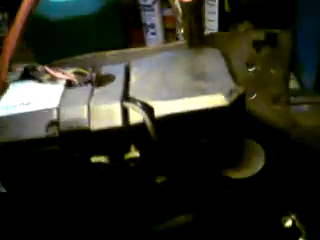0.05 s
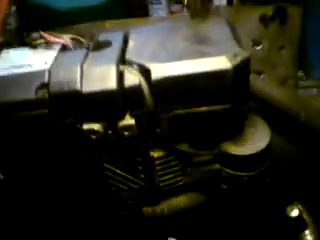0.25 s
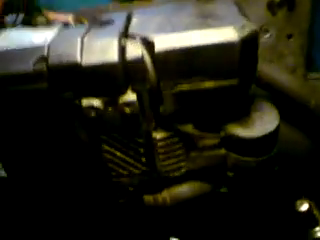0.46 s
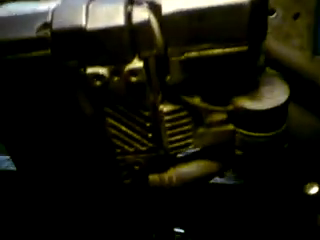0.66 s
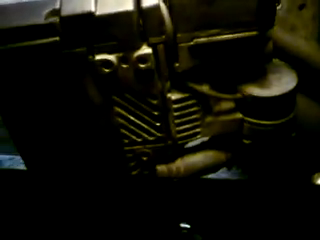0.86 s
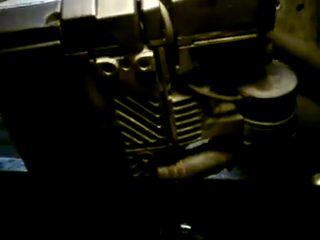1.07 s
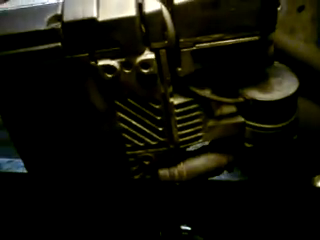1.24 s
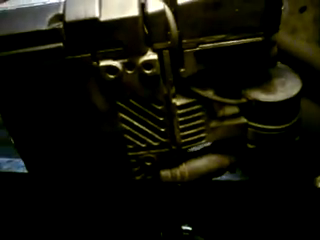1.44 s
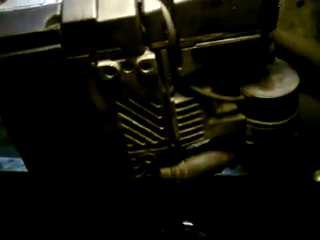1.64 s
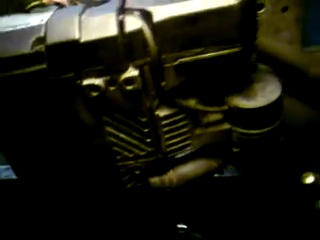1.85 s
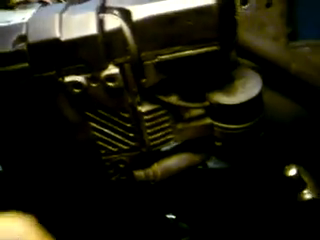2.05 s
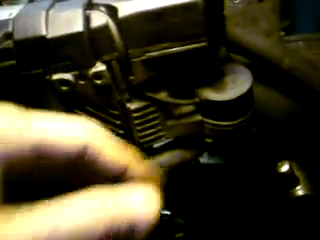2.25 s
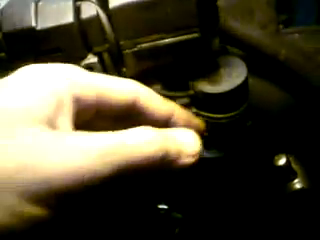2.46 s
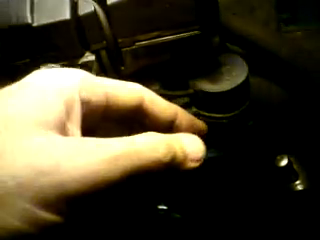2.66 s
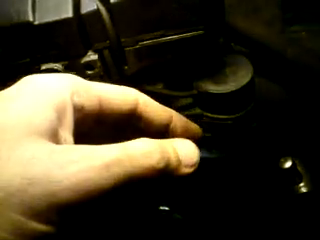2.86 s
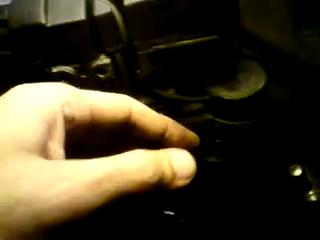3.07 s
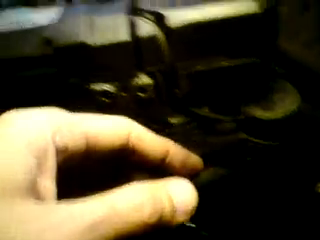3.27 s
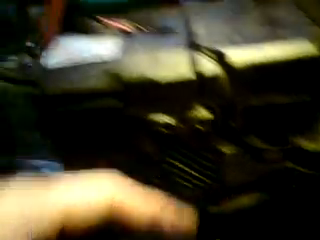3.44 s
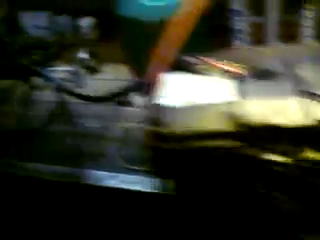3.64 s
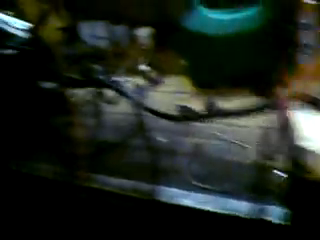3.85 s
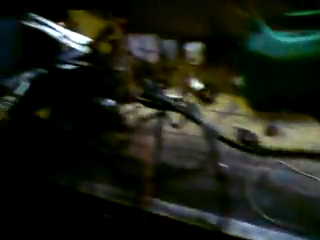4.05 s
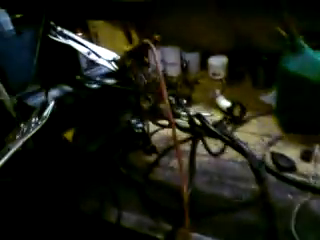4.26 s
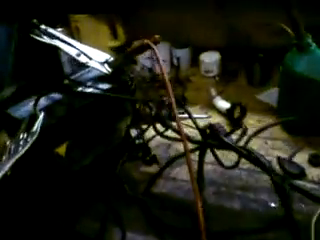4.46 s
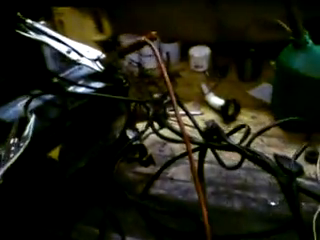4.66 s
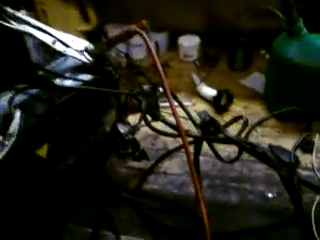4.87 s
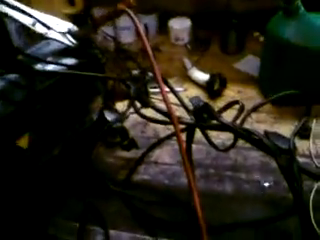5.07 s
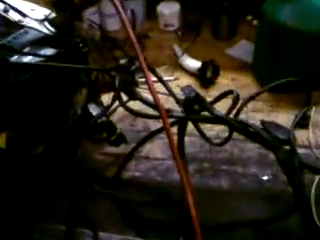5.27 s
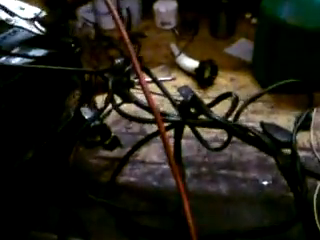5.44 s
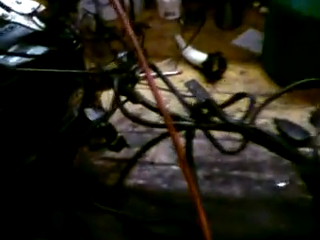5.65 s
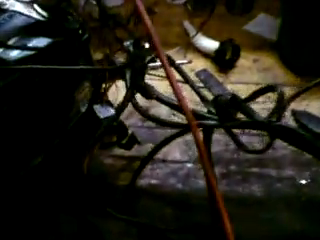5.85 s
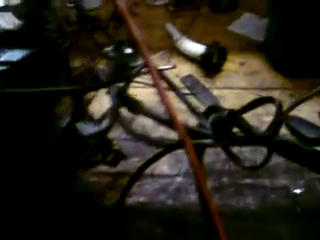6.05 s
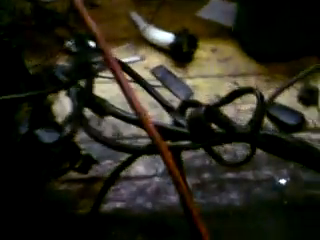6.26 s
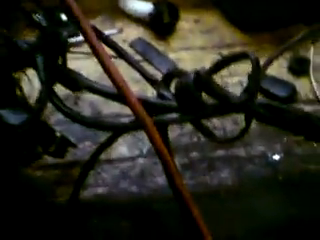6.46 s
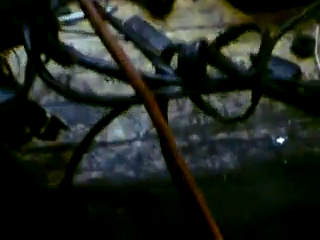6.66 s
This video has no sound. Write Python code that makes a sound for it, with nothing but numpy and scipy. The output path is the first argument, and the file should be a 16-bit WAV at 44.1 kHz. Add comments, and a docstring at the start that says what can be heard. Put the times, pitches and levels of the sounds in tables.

```python
"""A blower whine over a rush of air and flame, with a fixed-pitch singing tone, from a small fuel-fired heater
on a workbench. The whine and its companions are sines on whole multiples of the shaft speed, which sags at each
stroke of the fuel pump; the chopped motor drive and a thin whistle are sines of fixed pitch. The rush is shaped
noise. A hand-held microphone stays close to the casing, then swings away along the bench."""
import sys
import numpy as np
from scipy import signal
from scipy.io import wavfile
from scipy.ndimage import uniform_filter1d

SR = 44100
rng = np.random.default_rng(int(sys.argv[2]) if len(sys.argv) > 2 else 0)


def pcm_store(signal):
    """Save signal as 16-bit PCM."""
    levels = np.round(np.clip(np.atleast_2d(signal), -1, 1) * 32767)
    wavfile.write(sys.argv[1], SR, levels.astype(np.int16).T)


def ratio(d):
    """dB to gain"""
    e = np.asarray(d, float) / 20
    return 10 ** e


N = 295911  # length [samples]

# blower shaft before stroke sags and wobble: (time [s], speed [turns/s])
SHAFT_SPEED = [(0, 119.31), (.5, 119.45), (.95, 119.43), (1.3, 118.65), (1.8, 118.25), (2.2, 118.05),
               (2.8, 117.63), (3.5, 117.28), (3.9, 116.72), (4.4, 115.82), (5, 115.73), (5.55, 116.0),
               (6, 115.52), (6.71, 114.83)]
# fuel pump strokes, each loading the supply: (time [s])
PUMP_STROKES = [.49, 1.125, 1.752, 2.394, 3.03, 3.665, 4.333, 5.003, 5.668, 6.344]
# main whine at the moving microphone: (time [s], level [dB])
WHINE_LEVEL = [(0, -36.5), (.76, -36), (.86, -40), (1.1, -40), (1.2, -49), (1.55, -43.5), (1.87, -50.5),
               (2.15, -43), (2.4, -38.5), (2.67, -43), (3.25, -41), (3.75, -32), (4.02, -34.5), (4.25, -40),
               (4.36, -56), (4.49, -45), (5.25, -40), (5.37, -45), (5.77, -48.5), (5.87, -53), (6.38, -45),
               (6.62, -44), (6.71, -50)]
# its three strongest companions, before waver:
# (time [s], order 14 level [dB], order 24 level [dB], order 38 level [dB])
COMPANION_LEVELS = [(0, -44, -70, -44.5), (.35, -44, -53, -45.5), (1.0, -42, -59, -52),
                    (1.4, -44.5, -55, -47.5), (2.1, -45.5, -57, -51.5), (2.5, -45, -57.5, -44),
                    (3.5, -43.5, -56.5, -47), (3.95, -47, -59, -48), (4.2, -52.5, -54.5, -59.5),
                    (4.5, -59.5, -53, -58), (5.05, -56, -52.5, -52), (5.3, -63, -50.5, -59.5),
                    (5.5, -69, -53, -55), (5.75, -65, -57, -60), (5.88, -69, -67, -52),
                    (6.12, -71, -67, -67), (6.4, -69, -58, -53.5), (6.71, -71, -58, -55.5)]
# shaft orders of those companions: (order [cycles per turn])
COMPANION_ORDERS = [14, 24, 38]
# weaker shaft orders, before waver:
# (order [cycles per turn], level near the casing [dB], level along the bench [dB])
WEAK_ORDERS = [(9, -60, -76), (11, -53, -65), (13, -55, -65), (15, -52, -71), (16, -62, -64),
               (17, -53, -66), (18, -62, -68), (20, -70, -68), (21, -61, -62), (22, -65, -64),
               (23, -61, -62), (25, -63, -63), (26, -71, -63), (31, -59, -74), (32, -65, -72),
               (36, -52, -65), (37, -63, -69), (40, -66, -72), (41, -72, -72), (42, -80, -74),
               (43, -79, -76), (53, -83, -85), (54, -82, -82), (55, -80, -84), (56, -79, -80),
               (57, -78, -90)]
# drive tone and its third harmonic: (frequency [Hz])
DRIVE_TONES_HZ = [1965.3, 5895.9]
# drive tone at the microphone: (time [s], level [dB])
DRIVE_LEVEL = [(0, -33), (.45, -35.5), (.7, -38.5), (.9, -38), (1.9, -37.5), (2.42, -40), (2.62, -45.5),
               (3.02, -49), (3.3, -38), (3.7, -37.5), (4.1, -42.5), (4.27, -58), (4.5, -56), (4.63, -50.5),
               (4.95, -48), (5.36, -51), (5.5, -46), (5.88, -49), (6.02, -64), (6.13, -56), (6.35, -53.5),
               (6.71, -37)]
# third harmonic of the drive tone: (time [s], level [dB])
DRIVE_THIRD_LEVEL = [(0, -68.5), (.42, -60.5), (.65, -71), (1.45, -60.5), (1.62, -71.5), (2.0, -64),
                     (2.7, -73), (3.4, -61), (3.68, -71.5), (3.88, -61.5), (4.28, -53), (4.75, -74.5),
                     (4.95, -61.5), (5.13, -69), (5.55, -62.5), (5.97, -72.5), (6.15, -60.5), (6.37, -67),
                     (6.63, -55), (6.71, -57)]
# thin whistle, strongest in front of the casing: (time [s], level [dB])
WHISTLE_LEVEL = [(0, -76), (.5, -60.5), (1.1, -53.5), (2.5, -53), (3.2, -57), (3.5, -67), (4.0, -61),
                 (4.4, -71), (6.71, -79)]
# rush at the microphone, relative levels: (time [s], whole rush [dB], extra treble facing the air intake [dB])
MIC_RUSH = [(0, -46, -3.5), (.3, -46, -1), (.55, -45, 0), (1.0, -45.5, .5), (2.0, -46.5, .5), (2.8, -45, 0),
            (3.4, -46, 0.5), (3.75, -46.5, .5), (3.95, -49, 0), (4.3, -53.5, -2), (4.9, -55, -2.5),
            (5.2, -54.5, -2), (5.55, -55.5, -1), (5.8, -54, -4), (6.1, -55.5, -4.5), (6.71, -54, -4)]
# nearness of the microphone to the casing: (time [s], share [0-1])
NEARNESS = [(0, 0.95), (3.7, 1), (4.1, 0.3), (4.4, 0.37), (6.71, 0.14)]
# colour of the rush: (frequency [Hz], gain near the casing [dB], gain along the bench [dB])
RUSH_COLOUR = [(205, -10.5, -2), (314, 4, 5.5), (480, 5, 3.5), (640, 1.5, 2), (694, 1.5, -5), (860, 0.5, 0),
               (1000, -0.5, -0.5), (1070, -0.5, 1.5), (1210, 4, 6), (1600, 5, -4.5), (2090, 9, 7.5),
               (2390, -3, 6), (2650, -9, 4), (2900, -3, 3.5), (3290, 2.5, 2.5), (3544, -2.5, -4),
               (4145, 7.5, 3), (4890, -8, 1.5), (5100, -20.5, -13.5)]
# band limits of the rush at the microphone: (frequency [Hz], gain [dB])
RUSH_LIMITS = [(25, -28.5), (70, -16.5), (120, -0.5), (5600, -1), (5950, 3.5), (6350, -3), (6800, 1.5),
               (7500, 0), (7800, 2.5), (8300, -2.5), (8450, -16.5), (9100, -40), (9800, -71)]
# echo off the bench top, before the treble is scattered: (time [s], delay [ms], strength [0-1])
BENCH_ECHO = [(0, 0.7, 0.04), (3.9, 1.06, 0), (4.5, 1.56, 0.16), (5.1, 1.62, 0.4), (5.7, 1.58, 0.46),
              (6.2, 1.44, 0.4), (6.71, 1.48, 0.4)]
# flame rumble, relative: (frequency [Hz], level near the casing [dB], level along the bench [dB])
FLAME_RUMBLE = [(25, -82, -80.5), (71, -75, -76), (123, -54, -65), (170, -57, -59.5), (218, -60.5, -56),
                (272, -67, -66.5), (400, -89.5, -91), (810, -150, -150)]

SAG_TURNS_PER_S, SAG_S, RECOVER_S = 0.63, 0.075, 0.25  # sag scale before recovery, ramp, recovery constant
WHINE_ORDER, WHISTLE_HZ = 19, 2908
FLAME_LIFT_DB = 1.9  # peak lift of the rush at a stroke


def curves(rows, t):
    """Columns of a table joined by straight lines."""
    s, *columns = np.transpose(rows)
    return [np.interp(t, s, c) for c in columns]


def spectra(rows, hz):
    """Columns of a table read on a log-frequency axis."""
    return curves([(np.log(f), *db) for f, *db in rows], np.log(hz + 1))


def drift(t, top_hz):
    """Slow random movement of standard deviation 1: twelve sines, the slower ones stronger."""
    hz = np.geomspace(top_hz / 20, top_hz, 12)
    phase = rng.random((12, 1))
    x = np.sin(2 * np.pi * (hz[:, None] * t + phase)).T @ hz ** -0.5
    return x / x.std()


def slow_drift(t, top_hz):
    """The same movement computed on every 256th sample and joined by straight lines."""
    coarse = t[::256]
    return np.interp(t, coarse, drift(coarse, top_hz))


def tone(turns, db):
    """A sine of the given rms level, its phase counted in turns from a random start."""
    return np.sqrt(2) * ratio(db) * np.sin(2 * np.pi * (turns + rng.random()))


def shaft(t):
    """Shaft speed [turns/s]: a slow run-down, dented by every pump stroke."""
    since = t - np.array(PUMP_STROKES)[:, None]
    onset = np.clip(since / SAG_S + 0.5, 0, 1)  # ramp centred on the stroke
    recovery = np.exp(-np.maximum(since, 0) / RECOVER_S)
    sag = (onset * recovery).sum(0)
    return curves(SHAFT_SPEED, t)[0] - SAG_TURNS_PER_S * sag


def blower(t, turns):
    """Blades and windings ring on whole multiples of the shaft; all but the main whine waver at random."""
    near = curves(NEARNESS, t)[0]
    out = tone(WHINE_ORDER * turns, curves(WHINE_LEVEL, t)[0])
    for order, db in zip(COMPANION_ORDERS, curves(COMPANION_LEVELS, t)):
        waver_db = 1.5 * slow_drift(t, 5)
        out += tone(order * turns, db + waver_db)
    for order, near_db, far_db in WEAK_ORDERS:
        waver_db = 2.8 * slow_drift(t, 3)
        out += tone(round(order) * turns, near * near_db + (1 - near) * far_db + waver_db)
    return out


def drive(t):
    """The chopped supply makes the windings sing at a pitch that ignores the speed."""
    levels = curves(DRIVE_LEVEL, t) + curves(DRIVE_THIRD_LEVEL, t)  # a list of two
    return sum(tone(hz * t, db) for hz, db in zip(DRIVE_TONES_HZ, levels))


def whistle(t):
    """A thin sine of steady pitch whose level follows the microphone's place."""
    return tone(WHISTLE_HZ * t, curves(WHISTLE_LEVEL, t)[0])


def rush(turns):
    """Turbulent air and flame: random spectra coloured by casing, intake and bench echo."""
    frames = N // 256 + 5
    hz = np.fft.rfftfreq(1024, 1 / SR)[:, None]
    t = np.arange(frames) * 256 / SR
    near = curves(NEARNESS, t)[0]
    rush_db, intake_db = curves(MIC_RUSH, t)
    real, imaginary, patches = rng.standard_normal((frames, 513, 3)).T
    # random patches of level, smooth over frequency and time
    patches = uniform_filter1d(uniform_filter1d(patches, size=10, axis=0), size=30, axis=1)
    patches_db = 1.02 * patches / patches.std()

    near_db, far_db = spectra(RUSH_COLOUR, hz)
    colour_db = near * near_db + (1 - near) * far_db + spectra(RUSH_LIMITS, hz)[0]
    intake = 1 / (1 + (2900 / (hz + 1)) ** 8)  # the intake beams the treble
    air_db = colour_db + rush_db + intake * intake_db - 12.5

    delay_ms, strength = curves(BENCH_ECHO, t)
    scatter = 1 / (1 + (hz / 2500) ** 4)  # clutter on the bench breaks up the treble echo
    delayed = np.exp(-2j * np.pi * hz * delay_ms / 1000)
    echo = 1 + np.clip(strength, 0, 1) * scatter * delayed

    low_near_db, low_far_db = spectra(FLAME_RUMBLE, hz)
    rumble = ratio(near * low_near_db + (1 - near) * low_far_db)
    # the flame lifts just after each stroke
    flame_db = sum(FLAME_LIFT_DB * np.exp(-((t - s - 0.01) / 0.027) ** 2) for s in PUMP_STROKES)
    size = np.hypot(ratio(air_db) * abs(echo), rumble) * ratio(flame_db + patches_db)
    air = signal.istft((real + 1j * imaginary) * size, nperseg=1024, noverlap=768)[1][:N]
    treble = signal.sosfilt(signal.butter(2, 3000, "high", fs=SR, output="sos"), air)
    # the treble throbs with the rotor, once and twice a turn
    throb = 0.11 * np.cos(2 * np.pi * turns) + 0.21 * np.cos(4 * np.pi * turns)
    return air + treble * throb


def scene():
    """Blower, drive, whistle and rush at one microphone."""
    t = np.arange(N) / SR
    wobble = 1 + 0.00022 * slow_drift(t, 30)
    turns = np.cumsum(shaft(t) * wobble) / SR
    return (blower(t, turns) + drive(t) + whistle(t) + rush(turns))[None]


def drop_masked(x, below_all_db=-51, below_near_db=-22, jitter_db=4):
    """Thrifty compression: lines far weaker than the whole sound, or than their neighbours, are dropped."""
    z = signal.stft(x, nperseg=2048, noverlap=1536)[2]
    power = uniform_filter1d(abs(z) ** 2, size=5, axis=1)
    whole = uniform_filter1d(power.sum(0), size=20) * ratio(below_all_db) ** 2
    spread = uniform_filter1d(power, 41, 0, origin=8)  # reaches further down in pitch than up
    nearby = spread * ratio(below_near_db) ** 2
    bands = rng.standard_normal((z.shape[1], 257)).T.repeat(4, 0)[:1025]
    jitter = uniform_filter1d(bands, size=24, axis=1)  # each band keeps its threshold for a while
    above_db = 10 * np.log10(power / (whole + nearby) + 1e-12) + jitter_db * jitter / jitter.std()
    gate = 1 / (1 + np.exp(np.clip(-above_db * 2, -50, 50)))
    hz = np.fft.rfftfreq(2048, 1 / SR)[:, None]
    keep = np.where((hz < 1000) | (hz > 8400), 1, gate)  # bass and top pass whole
    return signal.istft(z * keep, nperseg=2048, noverlap=1536)[1][:N]


def top_cut(x):
    """Nothing passes above the cut-off."""
    return signal.sosfilt(signal.butter(12, 9030, fs=SR, output="sos"), x)


def record(dry):
    """The microphone's sound, thinned of its masked lines."""
    mix = drop_masked(dry[0])[None]
    return top_cut(mix)


dry = scene()
out = record(dry)
pcm_store(out)
```